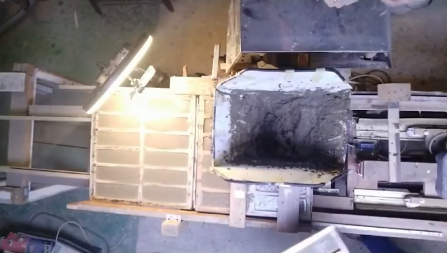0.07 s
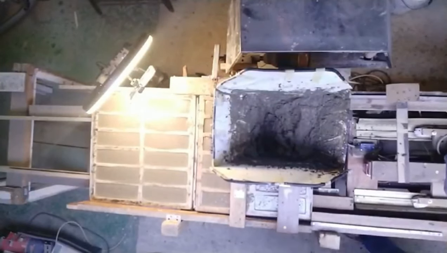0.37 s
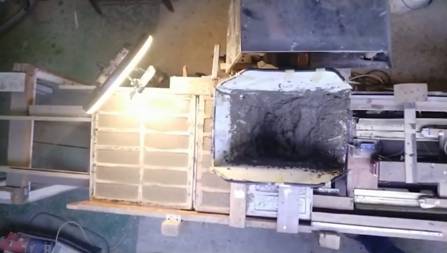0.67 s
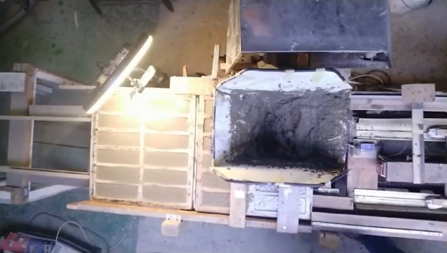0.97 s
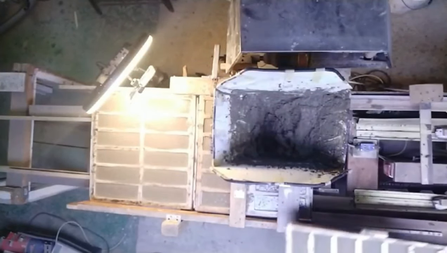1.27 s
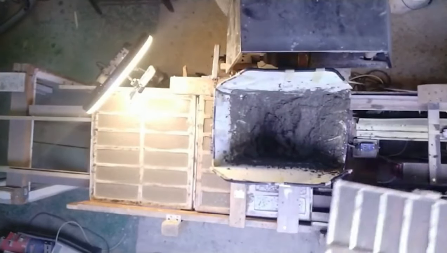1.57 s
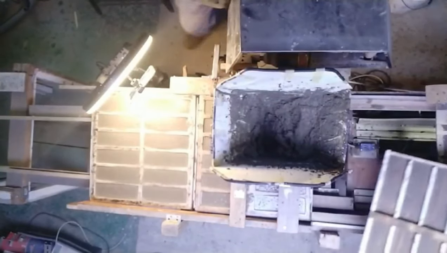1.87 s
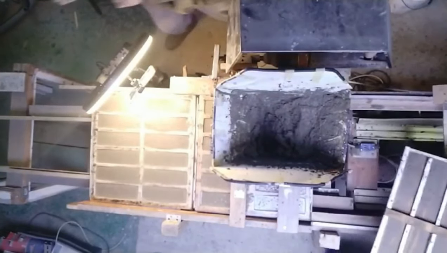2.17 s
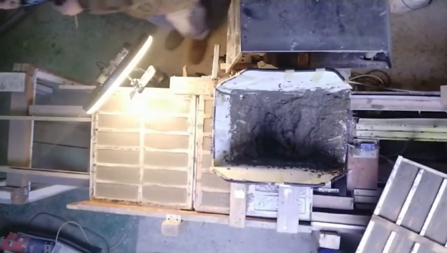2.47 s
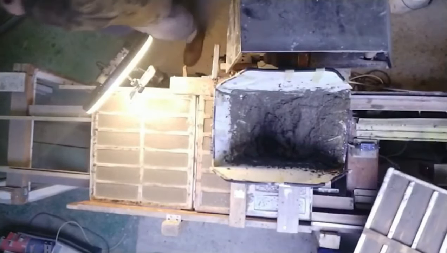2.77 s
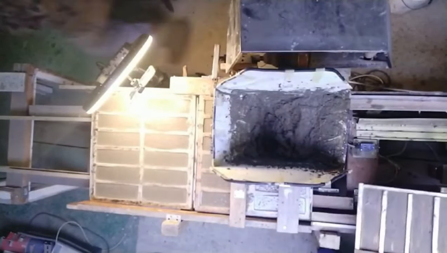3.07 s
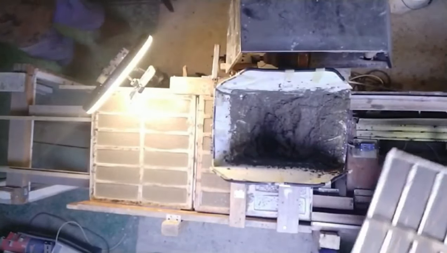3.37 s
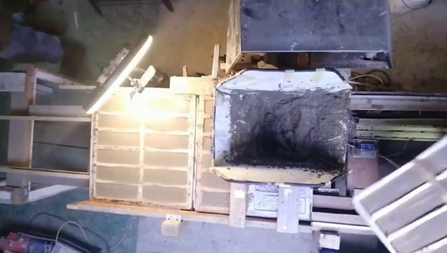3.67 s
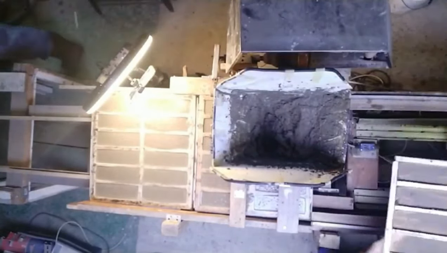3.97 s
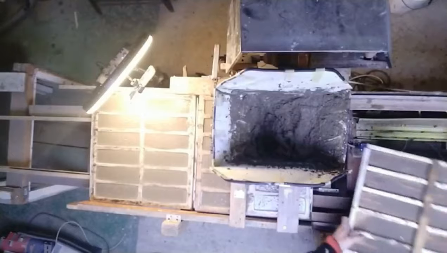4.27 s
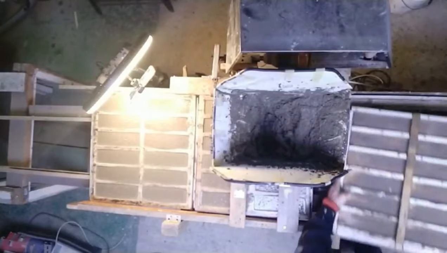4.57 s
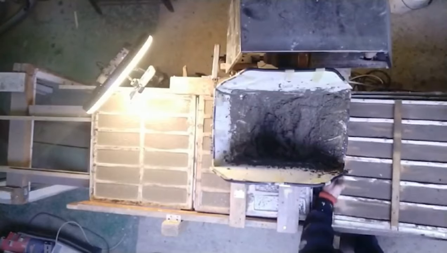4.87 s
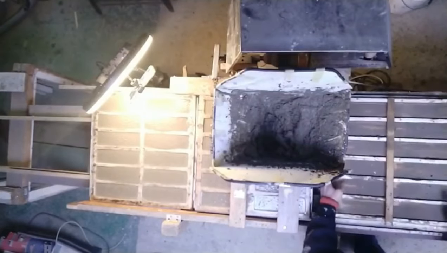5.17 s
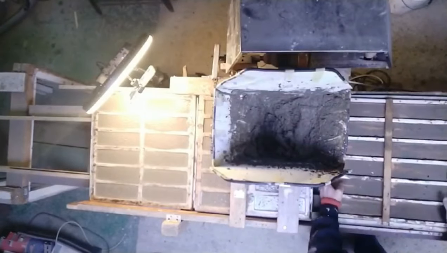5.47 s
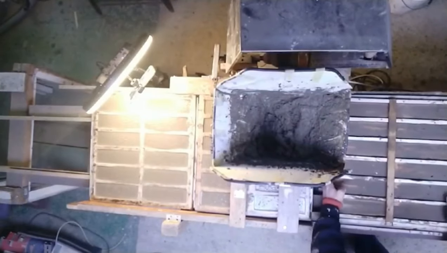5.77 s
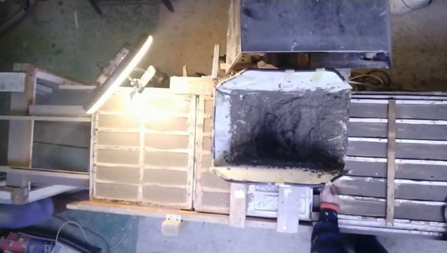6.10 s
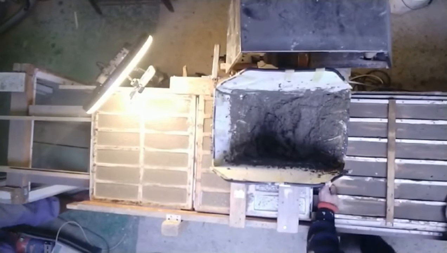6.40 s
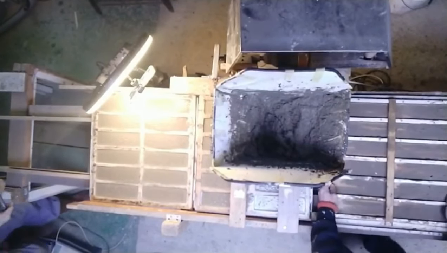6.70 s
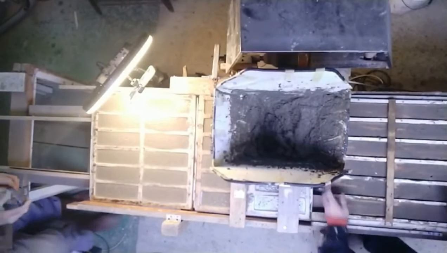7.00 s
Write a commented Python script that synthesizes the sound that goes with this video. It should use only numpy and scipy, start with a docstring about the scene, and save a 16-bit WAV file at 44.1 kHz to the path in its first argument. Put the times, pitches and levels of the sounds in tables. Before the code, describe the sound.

A casting machine drones loudly in a hard-walled workshop from the first moment to the end, about seven seconds in all. Its drive gives a steady low hum with a very fast chug, and rapid, smeared knocks repeat with every turn. A broad rush of air fills the room, and shaken metal parts add a continuous, light, high chatter. At around 2 seconds the hum sags very slightly in pitch and a loose panel rattles for under a second. The speed then creeps up, with single tones swelling and fading. The panel rattles again from about 3.5 seconds and carries on almost unbroken to the end. A fan whine, faint at first, becomes stronger from about 4.5 seconds and is clearest near 6 seconds. The overall loudness stays even, with the hum central and the hiss spread wide.

```python
"""The drive of a casting machine drones in a hard-walled workshop, turning about 30 times a second.
Its casing hums on multiples of that rate, and the tones swell and fade as the speed creeps up.
The same knocks and clatter come round on every turn. A faster rotor, likely a belt-driven fan, whines,
a loose panel rattles in spells, and shaken metal parts chatter. A broad rush of air fills the room."""
import sys
import numpy as np
from scipy import signal
from scipy.fft import rfft, irfft
from scipy.io import wavfile

SR = 44100
rng = np.random.default_rng(int(sys.argv[2]) if len(sys.argv) > 2 else 0)


def transcribe(u):
    """Save the signal u as a 16-bit wav file named by the first command-line argument.

    u: samples, shape (n,) or (channels, n), limited to [-1, 1]; the rate is SR.
    q: integer samples, one column per channel.
    """
    v = np.clip(np.atleast_2d(u).T, -1, 1)
    q = np.round(v * 32767).astype(np.int16)
    wavfile.write(sys.argv[1], SR, q)


N = 314874
TIME = np.arange(N) / SR

# Each layer has two rows: "centre" is what left and right share, "side" is how they differ.
# How fast the shaft turns, sagging briefly and then creeping up (time [s], turns a second [Hz])
SHAFT_SPEED = [(0.0, 30.04), (1.5, 30.03), (2.0, 29.76), (3.0, 29.97), (3.5, 30.13), (4.15, 30.19),
               (4.75, 30.32), (5.6, 30.23), (6.2, 30.38), (7.14, 30.42)]
# Tones of the casing (multiple of the shaft rate, centre level [dB], side level [dB])
CASING_TONES = [(5, -52, -80), (7, -49.5, -70), (8, -42, -60), (9, -26.5, -45), (10, -34, -58),
                (10.5, -46, -58), (11, -33, -49), (11.5, -45.5, -57), (12, -43, -48), (13, -47, -59),
                (14, -44.5, -46), (15, -39, -62), (16, -46.5, -51), (18, -43.5, -54), (20, -42.5, -43),
                (22, -41, -42), (24, -44.5, -51), (26, -49, -41), (27, -38.5, -49), (29, -47, -43),
                (31, -41.5, -41), (33, -36.5, -36.5), (35, -39, -39), (37, -47, -48), (38, -45, -50),
                (40, -45, -44), (43, -42, -41), (45, -44, -43), (55, -38.5, -39), (58, -42, -44),
                (61, -40, -48), (76, -39.5, -40)]
# Speeds at which casing tones ring best
# (multiple, best shaft rate above the mean [Hz], lift there [dB], drop away from it [dB per Hz])
CASING_RESONANCES = [(8, -0.36, -1, 3.5), (9, 0.17, 1.4, 5), (10, 0.2, 0.5, 31), (11, -0.13, 0.5, 7.5)]
# Swells and dips of single casing tones
# (multiple, middle time [s], half length [s], centre lift [dB], side lift [dB])
CASING_SWELLS = [(58, 1.0, .5, 8, 2), (33, .2, .9, 0, 5), (33, 1.5, .4, 5, 0), (31, 1.95, .65, 9, 3),
                 (43, 2.1, .45, 7.5, 3), (45, 2.2, .5, 8, 4), (35, 2.25, .5, 6, 5), (37, 2.3, .6, 8, 3),
                 (26, 2.9, .5, 7, 0), (55, 3.0, .4, 4, 0), (76, 2.0, .35, -4, -2), (33, 4.25, 1.5, 9.8, 0),
                 (24, 4.0, 1.3, 3, 0), (76, 4.9, 1.3, -9, -6), (22, 5.3, 1.5, -6, 0), (20, 6.0, 1.6, -6, 0),
                 (55, 6.0, 1.6, -5, 0), (61, 6.0, 1.5, -9, 0), (31, 6.0, 1.3, -2, 7), (27, 6.0, 1.8, -6, 0),
                 (33, 6.7, .8, 3, 0), (31, 6.75, .35, 9, 0)]
# Strength of the clatter from low to high (frequency [Hz], level [dB per Hz])
CLATTER_SPECTRUM = [(120, -102.5), (220, -76), (400, -72), (700, -66), (1100, -61), (1800, -57.5),
                    (2500, -59), (4000, -60), (6000, -64), (9000, -80)]
# Tones of the fan
# (multiple of the blade rate, centre level [dB], side level [dB], share the panel takes up [0-1])
FAN_TONES = [(1, -43, -48, 0.1), (2, -42, -43, 0.25), (3, -50, -47, 0.2), (4, -29.3, -37, 1.0)]
# Swell of a fan tone that the loose panel takes up fully (time [s], lift [dB])
FAN_SWELL = [(0, -14), (1.3, -13), (2.1, -6), (3.1, -14), (3.7, -7), (4.4, -6), (4.75, -1), (5.3, -1.5),
             (6.2, 1.5), (7.14, -.5)]
# Spells in which the loose panel rattles (start [s], length [s], level [dB])
RATTLE_SPELLS = [(1.8, 0.7, -34.5), (3.55, 1.2, -35), (4.9, 2.2, -37)]
# Notes at which the metal parts ring (frequency [Hz], level [dB])
METAL_NOTES = [(1750, -38), (1830, -39), (2140, -39.5), (2360, -43), (2490, -46), (2885, -44), (3265, -38),
               (3740, -46), (4020, -41), (4340, -42.5), (4650, -52), (5040, -48), (6485, -37.5),
               (7115, -39)]
# Strength of the rushing air from low to high (frequency [Hz], level [dB per Hz])
AIR_SPECTRUM = [(30, -102), (110, -84), (200, -66), (290, -55), (380, -62), (520, -61.5), (760, -59.5),
                (1000, -55.5), (1550, -56), (2200, -56.5), (4200, -58.5), (6100, -59), (7900, -57.5),
                (8900, -63), (10600, -67)]
# Slow drift of the treble in the rushing air (time [s], lift [dB])
AIR_TREBLE = [(0, 0.4), (.5, 0), (1.05, 0.5), (2.2, -0.65), (2.95, -.5), (4.0, -1), (4.7, -0.2),
              (5.4, -0.6), (6.0, -0.5), (7.14, -1)]
# Narrow peaks and dips from ducts and panels (frequency [Hz], width [Hz], lift [dB])
DUCT_RESONANCES = [(1540, 60, -2), (2760, 200, -1.5), (3600, 120, -1.5), (4050, 200, 1.5), (4220, 60, -3),
                   (4400, 160, 2), (4830, 150, -3.5), (5030, 140, 2.5), (5840, 50, -3), (6200, 160, -2),
                   (6750, 160, -2.5), (7110, 160, 1.5), (7560, 400, 1.5), (8400, 150, 1.5), (8650, 250, -2),
                   (11330, 300, 3)]
# How wide the room sounds (frequency [Hz], side level minus centre level [dB])
ROOM_WIDTH = [(40, -8), (110, -17), (200, -17), (330, -8), (520, -3.5), (700, -2), (1100, -.5), (4000, 0),
              (8000, 0)]

MEAN_SHAFT_HZ, TOP_HZ = 30.15, 11500  # usual shaft rate; upper edge of the sound
MAIN_MULTIPLE = 9  # the loudest casing tone


def casing_drone(turns, overspeed_hz, neighbours=2, offset_cycles=.36):
    """The casing hums on multiples of the shaft rate; some tones swell as the speed makes them ring."""
    resonance_db = {round(k): lift_db - drop * abs(overspeed_hz - best_hz)
                    for k, best_hz, lift_db, drop in CASING_RESONANCES}
    out = 0
    for k, centre_db, side_db in CASING_TONES:
        fade_db = .028 * k * wander(2.1)  # slow fading, deeper for short waves
        centre_lift, side_lift = resonance_db.get(k, 0) + fade_db + casing_swell(k)
        # the main tone's neighbours work against it once a turn, so the hum chugs
        step = k - MAIN_MULTIPLE
        start = np.sign(step) * offset_cycles if abs(step) <= neighbours else rng.random()
        flutter_db = min(.6 + .25 * max(step, 0), 1.4)  # higher tones flutter more
        out = out + tone(k * turns + start, centre_db + centre_lift, side_db + side_lift, flutter_db)
    return out


def casing_swell(multiple):
    """Lift in dB of one casing tone, centre and side: each swell or dip comes and goes smoothly."""
    lift = np.zeros((2, N))
    for k, middle_s, half_s, centre_db, side_db in CASING_SWELLS:
        if k == multiple:
            bell = np.exp(-((TIME - middle_s) / half_s) ** 2)
            lift += np.array([[centre_db], [side_db]]) * bell
    return lift


def drive_clatter(turns, size=8192, patterns=5):
    """Knocks smeared by the room repeat on every turn; each pattern slowly gives way to the next."""
    hz = np.arange(size // 2 + 1) * MEAN_SHAFT_HZ  # one turn is `size` points long
    in_range = (hz > 0) & (hz < TOP_HZ)
    gain = colour(CLATTER_SPECTRUM, hz) * ducts(hz) * in_range * np.sqrt(MEAN_SHAFT_HZ / 2) * size
    gain = gain * np.array([np.ones(len(hz)), colour(ROOM_WIDTH, hz)])
    pattern_now = np.linspace(0, patterns - 1, N)
    out = 0
    for k in range(patterns):
        share = np.sqrt(np.maximum(1 - abs(pattern_now - k), 0))
        overtones = rfft(rng.standard_normal((2, size)) * knocks(np.arange(size) / size))
        overtones /= abs(overtones) ** .2  # even out their strengths a little
        one_turn = irfft(overtones / overtones.std() * gain)
        repeated = np.array([np.interp(turns % 1 * size, np.arange(size), row) for row in one_turn])
        out = out + share * repeated
    return out


def knocks(turns, at_turn=.72, knock_decay_turns=.07, ticks_per_turn=6, tick_decay_turns=.03):
    """Force over a turn: one main knock and a row of lighter ticks, each sudden and dying away."""
    since_knock = (turns - at_turn) % 1
    since_tick = since_knock % (1 / ticks_per_turn)
    force = 1 + 1.4 * np.exp(-since_knock / knock_decay_turns) + np.exp(-since_tick / tick_decay_turns)
    return force / np.sqrt(np.mean(force ** 2))


def fan_whine(turns, blades_per_turn=11.143):
    """The blades whine out of tune with the drone; tones the loose panel takes up swell and pulse."""
    swell_db = curve(FAN_SWELL)
    blade_passes = blades_per_turn * turns + .012 * wander(5.0)
    out = 0
    for k, centre_db, side_db, share in FAN_TONES:
        lift_db = share * swell_db
        whine = tone(k * blade_passes + rng.random(), centre_db + lift_db, side_db + lift_db, 1.1)
        out = out + panel_beats(turns, share) * whine
    return out


def panel_rattle(turns, ring_hz, width_hz, uneven_db, side_db):
    """A loose panel, shaken on every turn, rings in uneven bursts."""
    hz = np.arange(N // 2 + 1) * SR / N
    ring = irfft(rfft(rng.standard_normal((2, N))) * peak(hz, ring_hz, width_hz), N)
    ring *= panel_beats(turns) * undb(uneven_db * wander(13.0))
    return ring / ring.std() * panel_spells() * undb([[0], [side_db]])


def panel_beats(turns, share=1, at_turn=.1):
    """Gain of the panel over a turn: one strong beat and a weaker one half a turn later."""
    angle = 2 * np.pi * (turns - at_turn)
    gain = 1 + share * (.6 * np.cos(angle) + .45 * np.cos(2 * angle))
    return gain / np.sqrt(np.mean(gain ** 2))


def panel_spells(rise_s=.21, fall_s=.35, rest_db=-46):
    """Gain of the rattle over time: each spell builds up, holds and dies back to a faint buzz."""
    gain = undb(rest_db)
    for start_s, length_s, db in RATTLE_SPELLS:
        rising = 1 + (TIME - start_s) / rise_s
        falling = 1 - (TIME - start_s - length_s) / fall_s
        gain = np.maximum(gain, undb(db) * np.clip(np.minimum(rising, falling), 0, 1))
    return gain


def metal_chatter(turns, ring_s, contacts_per_s, scatter_db):
    """Shaken metal parts touch many times a second, most often on the knocks; each touch rings."""
    t = TIME[:SR // 4]
    decay = np.exp(-np.log(1000) * t / ring_s)  # 60 dB down after ring_s
    chance = contacts_per_s / SR * knocks(turns) ** 2
    out = 0
    for hz, db in METAL_NOTES:
        contacts = (rng.random((2, N)) < chance) * undb(scatter_db * rng.standard_normal((2, N)))
        ring = np.diff(np.sin(2 * np.pi * hz * t) * decay)
        ringing = signal.oaconvolve(contacts, ring[None], axes=1)[:, :N]
        out = out + undb(db) * ringing / ringing.std()
    return out


def air_rush(turns, flicker_db, surge_db, bands=36):
    """Swirling air rings the ducts; each band flickers alone, and all surge and throb faintly."""
    hz = np.arange(N // 2 + 1) * SR / N
    spectrum = rfft(rng.standard_normal((2, N))) * colour(AIR_SPECTRUM, hz) * ducts(hz) * np.sqrt(SR / 2)
    spectrum *= metal_echoes(hz, strength=.32)
    spectrum[1] *= colour(ROOM_WIDTH, hz)
    band_number = (bands - 1) * np.sqrt(np.minimum(hz / TOP_HZ, 1))
    treble_db = curve(AIR_TREBLE)
    surge = undb(surge_db * wander(5.0))
    throb = 1 + .03 * (np.sin(2 * np.pi * turns) + np.sin(4 * np.pi * turns))  # follows the shaft
    out = 0
    for k in range(bands):
        band = irfft(spectrum * np.maximum(1 - abs(band_number - k), 0), N)
        treble_share = min(2 * k / bands, 1)
        out = out + band * undb(flicker_db * wander(22.4) + treble_share * treble_db)
    return out * surge * throb


def ducts(hz):
    """Ducts and panels make some frequencies louder and others softer; returns the gain."""
    return undb(sum(db * peak(hz, ring_hz, width_hz) for ring_hz, width_hz, db in DUCT_RESONANCES))


def metal_echoes(hz, strength, count=10):
    """Echoes off nearby metal, a few milliseconds late, put ripples in the spectrum."""
    delays_s = rng.uniform(.002, .016, (count, 2, 1))
    echoes = sum(np.exp(-2j * np.pi * hz * delay) for delay in delays_s) / np.sqrt(count)
    depth = strength * hz / (hz + 1000)  # weaker in the bass
    return (1 + depth * echoes) / np.sqrt(1 + depth ** 2)


def tone(cycles, centre_db, side_db, flutter_db, flutter_hz=9):
    """One pure tone; echoes put its side out of step with its centre and make both flutter."""
    phase = 2 * np.pi * cycles
    shift = rng.choice([-1, 1]) * np.pi / 2 + .4 * rng.standard_normal()
    gain = np.sqrt(2) * undb(flutter_db * wander(flutter_hz))
    return gain * np.array([undb(centre_db) * np.sin(phase), undb(side_db) * np.sin(phase + shift)])


def wander(rate_hz):
    """A smooth random wobble, about 1 in size, that changes about `rate_hz` times a second."""
    steps = rng.standard_normal(2048)
    hz = np.arange(len(steps) // 2 + 1) * SR / N
    drift = irfft(rfft(steps) * np.exp(-(hz / rate_hz) ** 2) * (hz > 0))
    return np.interp(TIME, np.linspace(0, N / SR, len(drift)), drift / drift.std())


def peak(hz, ring_hz, width_hz):
    """A hump that is 1 at `ring_hz` and falls away on both sides."""
    return 1 / (1 + (2 * (hz - ring_hz) / width_hz) ** 2)


def colour(table, hz):
    """Gain at the given frequencies, from a table of (frequency [Hz], level [dB])."""
    table_hz, db = np.array(table, float).T
    return undb(np.interp(np.log(np.maximum(hz, 1)), np.log(table_hz), db))


def curve(table):
    """The value at every sample, from a table of (time [s], value)."""
    return np.interp(TIME, *np.array(table, float).T)


def undb(db):
    """Turns decibels into a gain, the number a signal is multiplied by."""
    return 10 ** (np.asarray(db) / 20)


def scene():
    """One slightly unsteady shaft sets the pace of every layer; centre and side become left and right."""
    speed_hz = curve(SHAFT_SPEED)
    turns = np.cumsum(speed_hz + .02457 * wander(5.81)) / SR  # turns made so far
    tones = casing_drone(turns, speed_hz - MEAN_SHAFT_HZ) + fan_whine(turns)
    clatter = drive_clatter(turns)
    rattle = panel_rattle(turns, ring_hz=1325, width_hz=84, uneven_db=2.2, side_db=-1)
    chatter = metal_chatter(turns, ring_s=.055, contacts_per_s=70, scatter_db=1.5)
    air = air_rush(turns, flicker_db=2.5, surge_db=.26)
    centre, side = tones + clatter + rattle + chatter + air
    return np.array([centre + side, centre - side])


def record(dry):
    """Rounds off the rare tallest peaks and steeply cuts the highest treble."""
    rounded = dry / (1 + (dry / .98) ** 8) ** (1 / 8)
    treble_cut = signal.ellip(12, .1, 90, TOP_HZ, fs=SR, output="sos")
    return signal.sosfilt(treble_cut, rounded)


dry = scene()
out = record(dry)
transcribe(out)
```